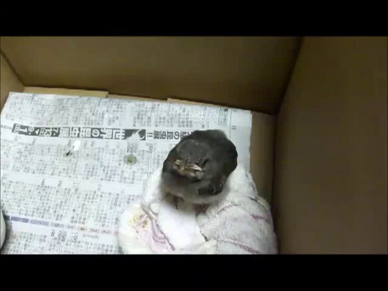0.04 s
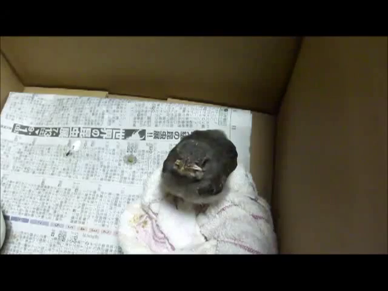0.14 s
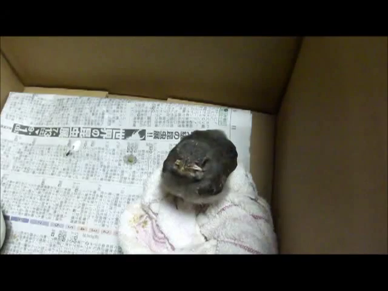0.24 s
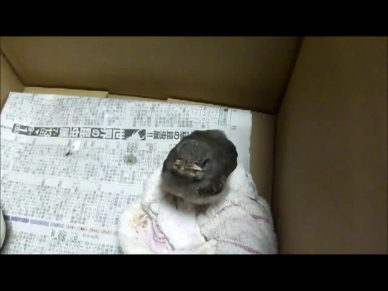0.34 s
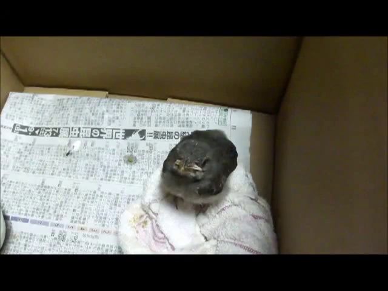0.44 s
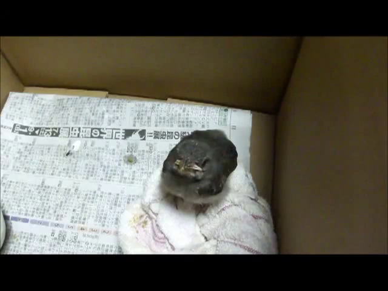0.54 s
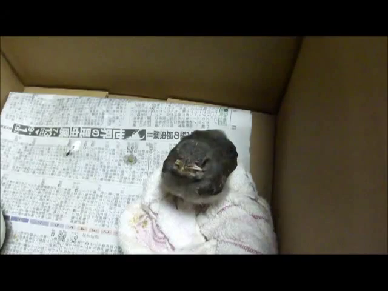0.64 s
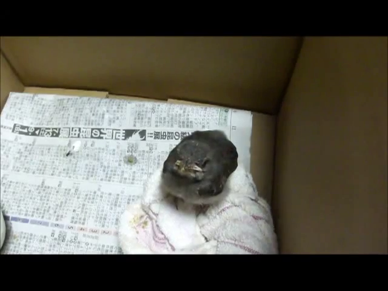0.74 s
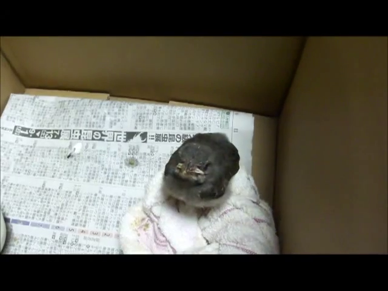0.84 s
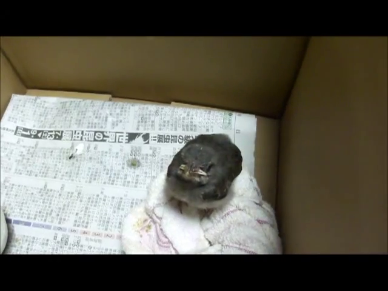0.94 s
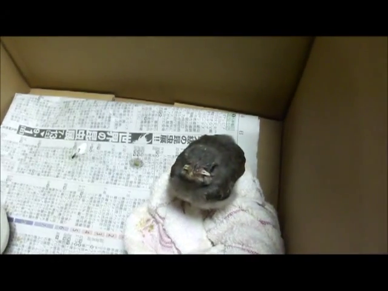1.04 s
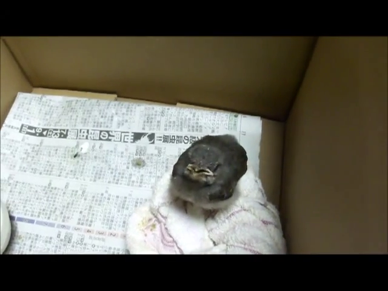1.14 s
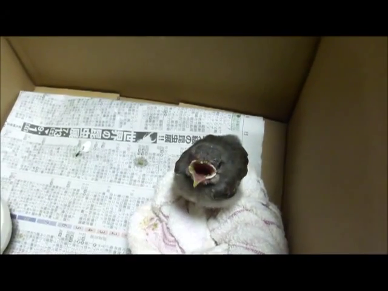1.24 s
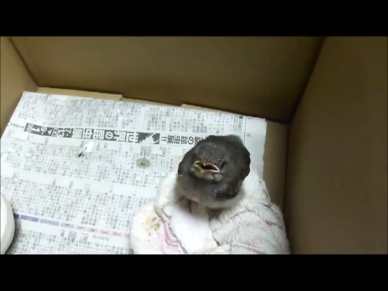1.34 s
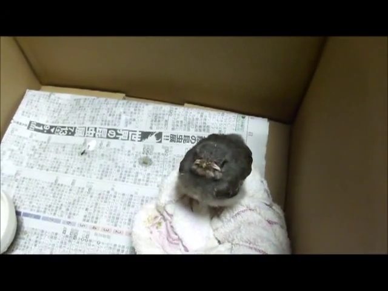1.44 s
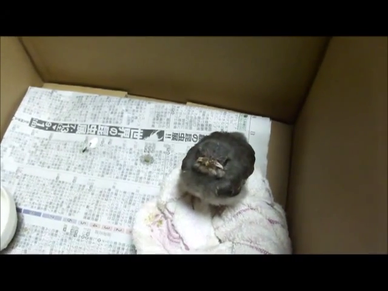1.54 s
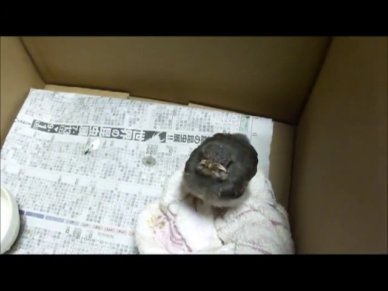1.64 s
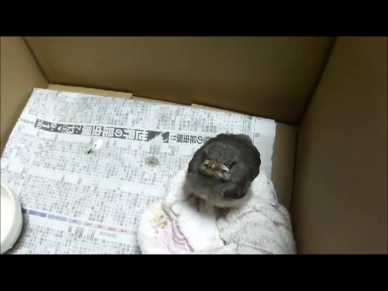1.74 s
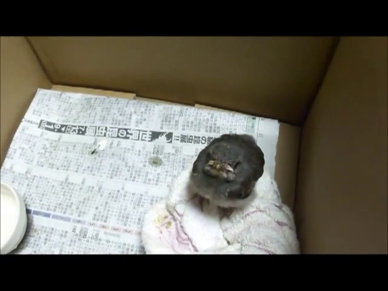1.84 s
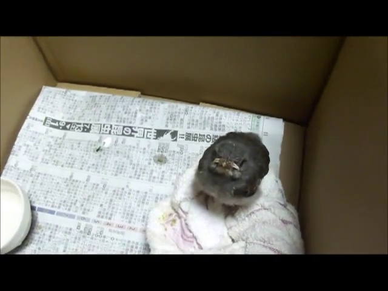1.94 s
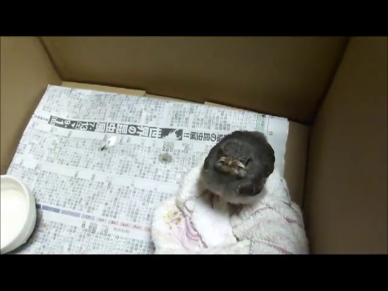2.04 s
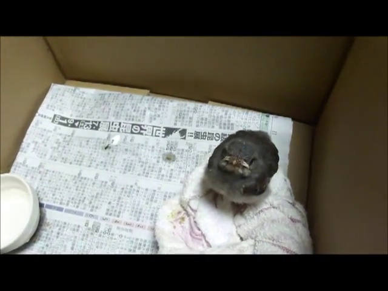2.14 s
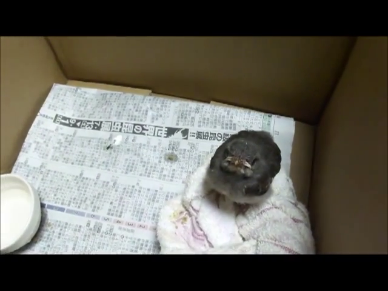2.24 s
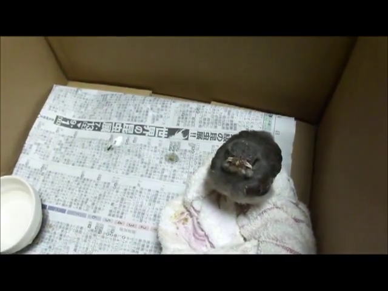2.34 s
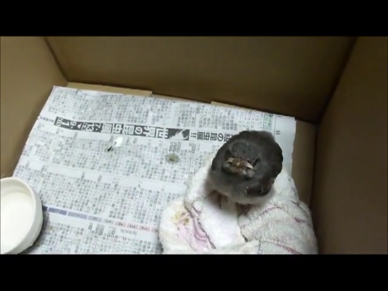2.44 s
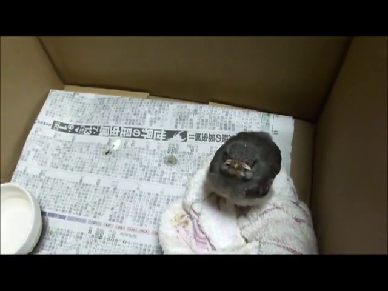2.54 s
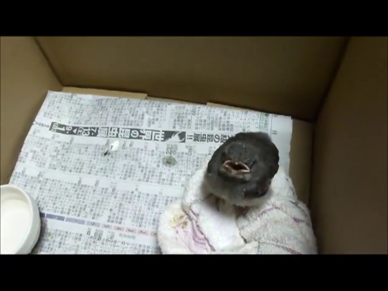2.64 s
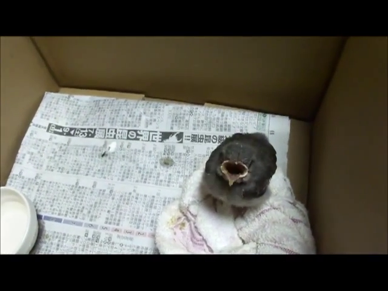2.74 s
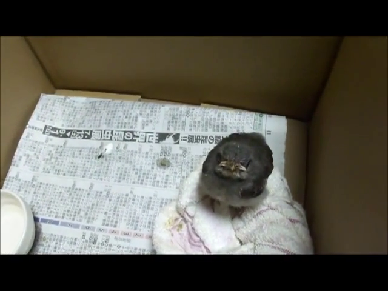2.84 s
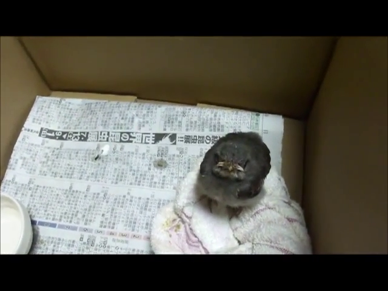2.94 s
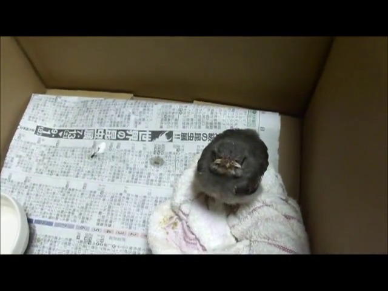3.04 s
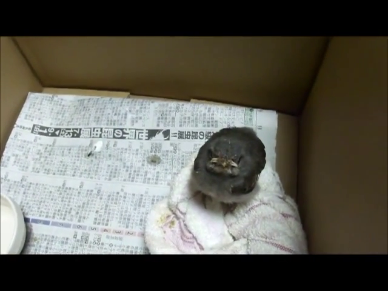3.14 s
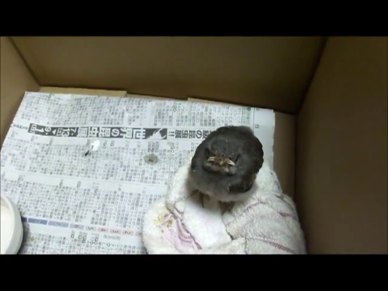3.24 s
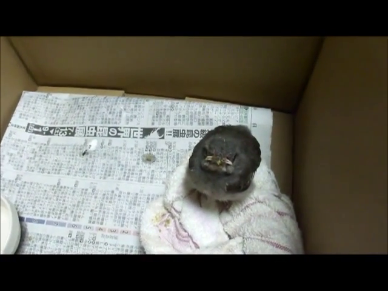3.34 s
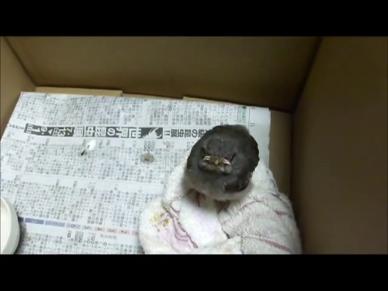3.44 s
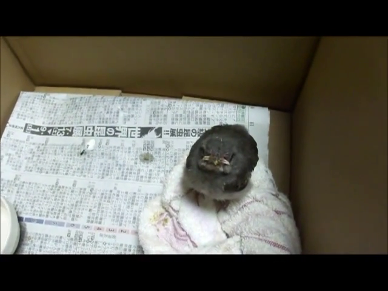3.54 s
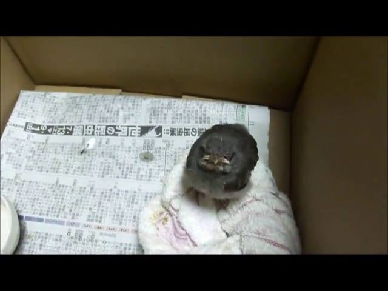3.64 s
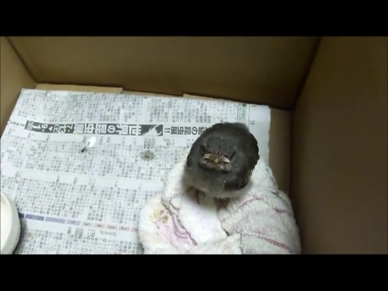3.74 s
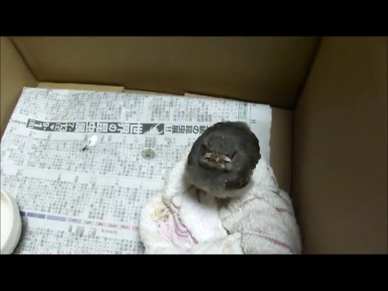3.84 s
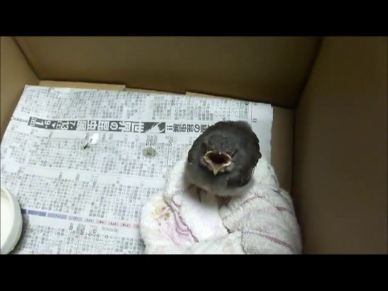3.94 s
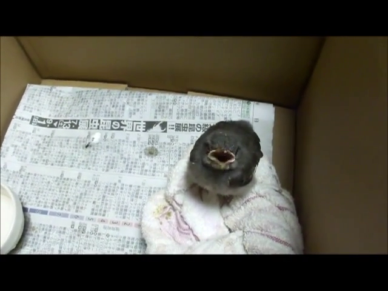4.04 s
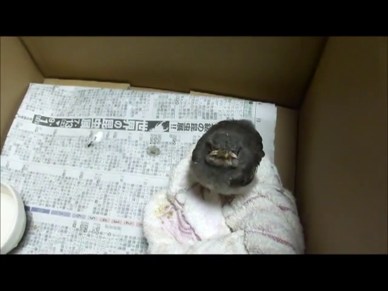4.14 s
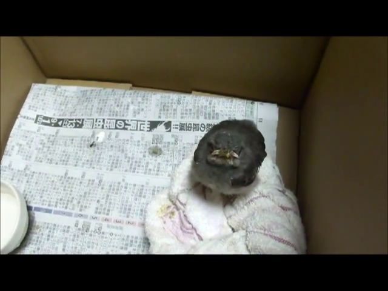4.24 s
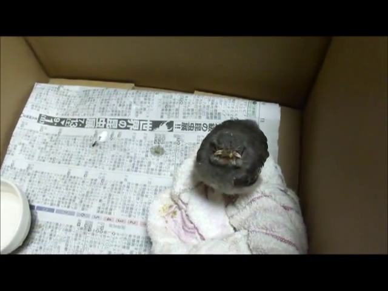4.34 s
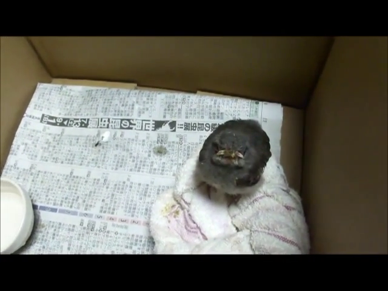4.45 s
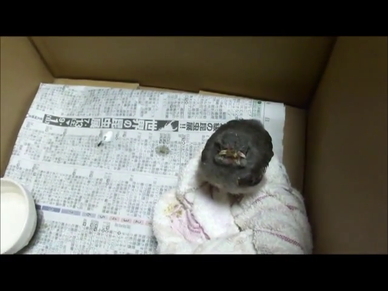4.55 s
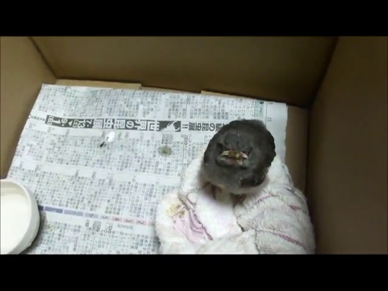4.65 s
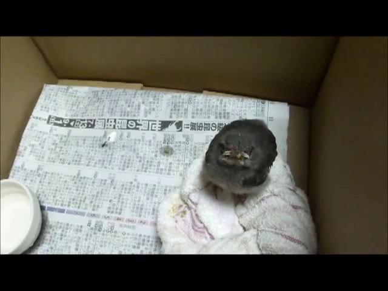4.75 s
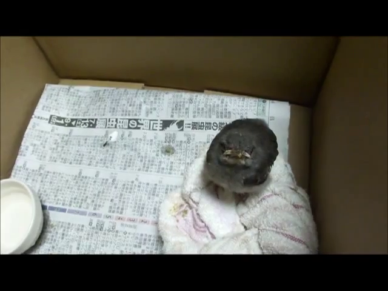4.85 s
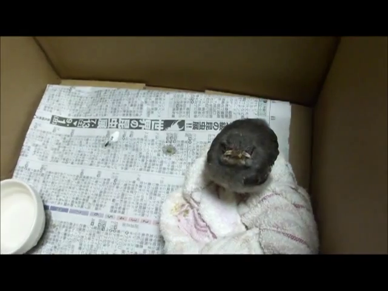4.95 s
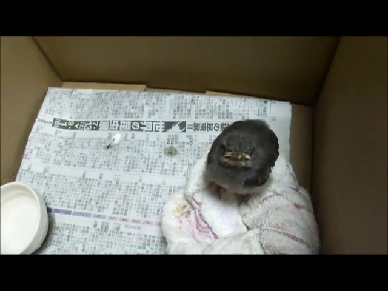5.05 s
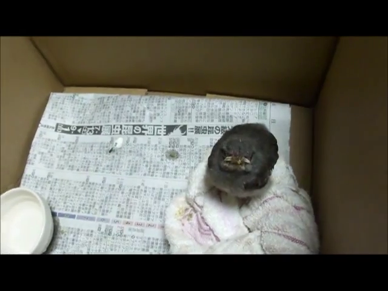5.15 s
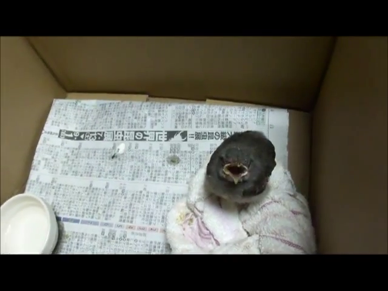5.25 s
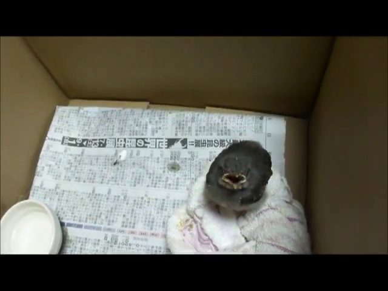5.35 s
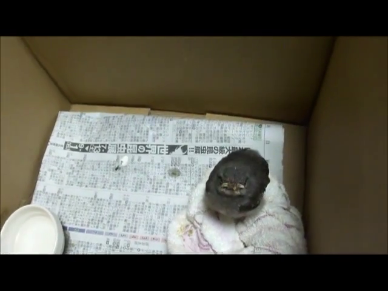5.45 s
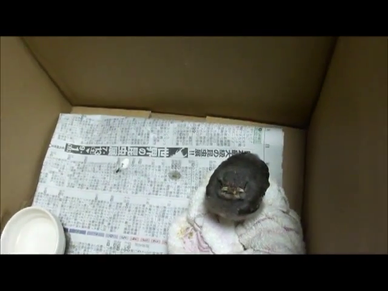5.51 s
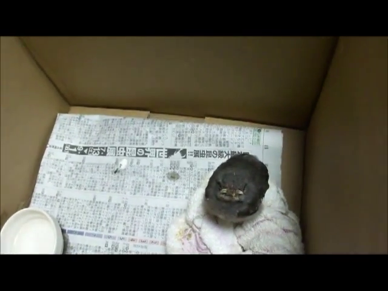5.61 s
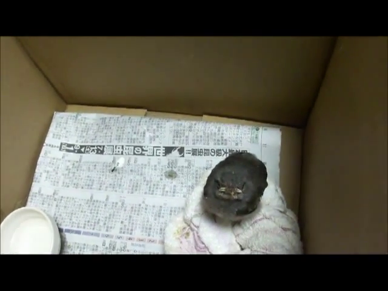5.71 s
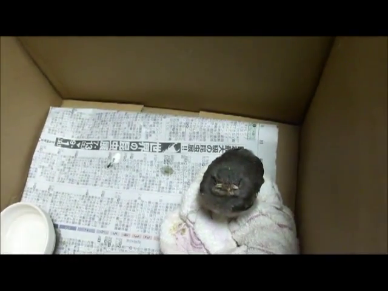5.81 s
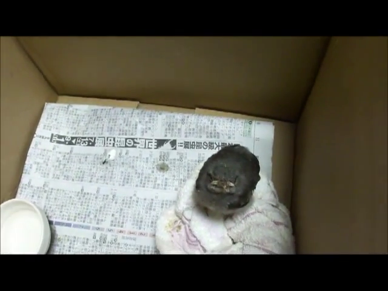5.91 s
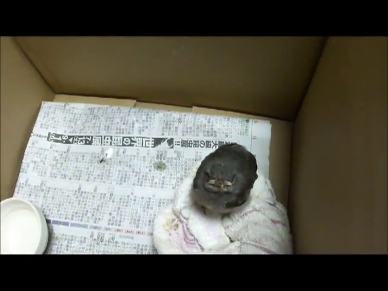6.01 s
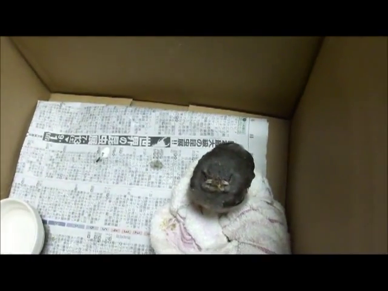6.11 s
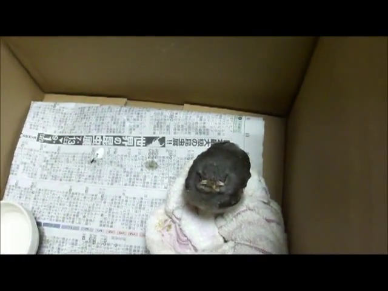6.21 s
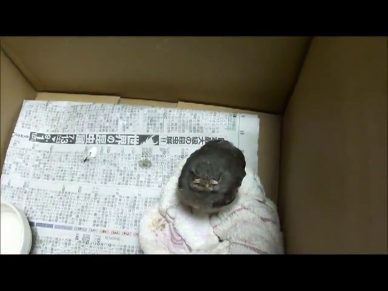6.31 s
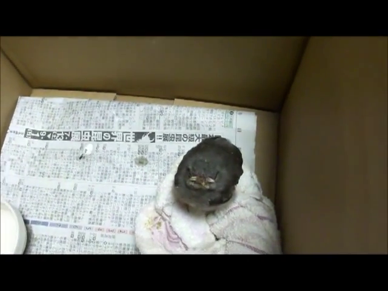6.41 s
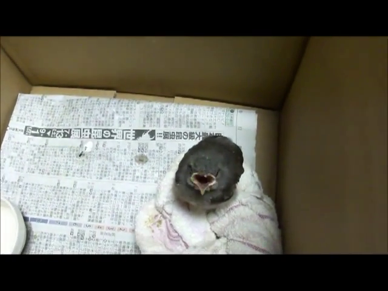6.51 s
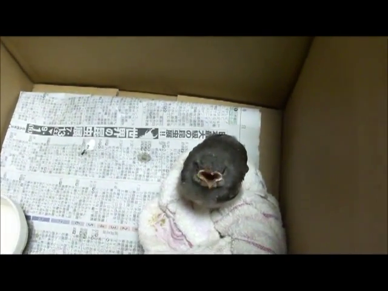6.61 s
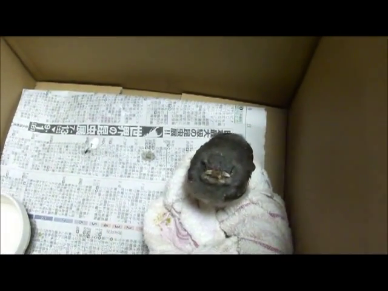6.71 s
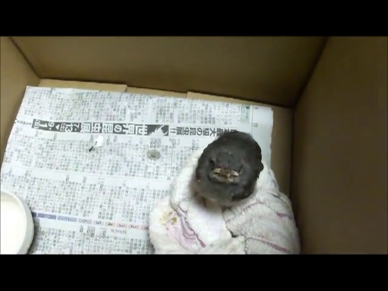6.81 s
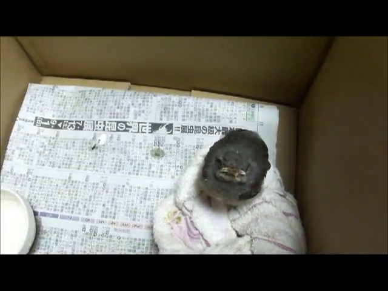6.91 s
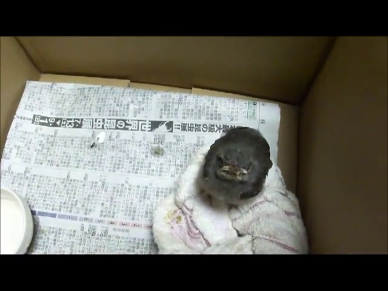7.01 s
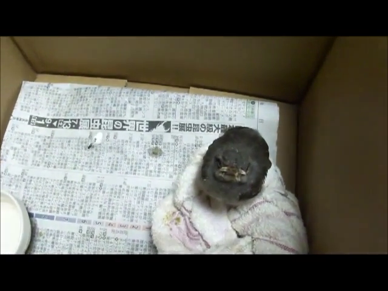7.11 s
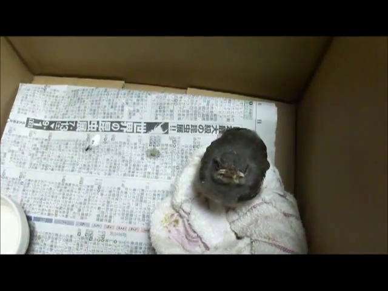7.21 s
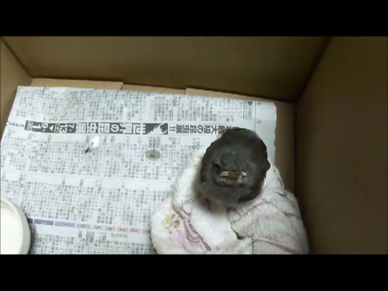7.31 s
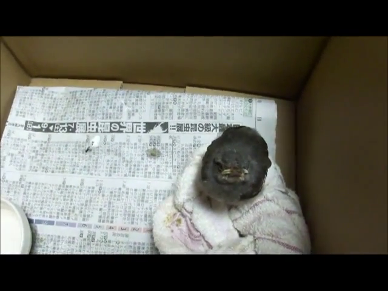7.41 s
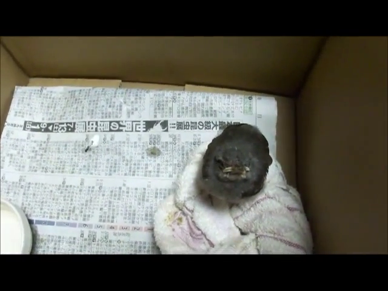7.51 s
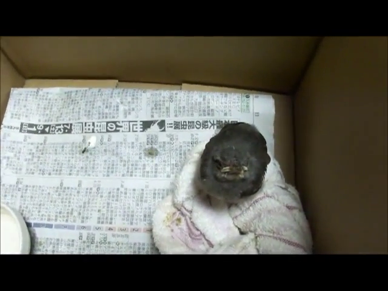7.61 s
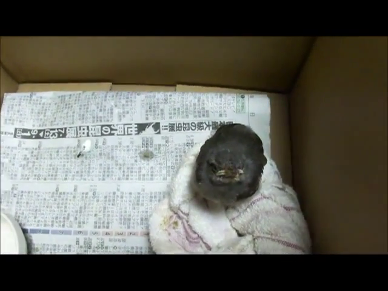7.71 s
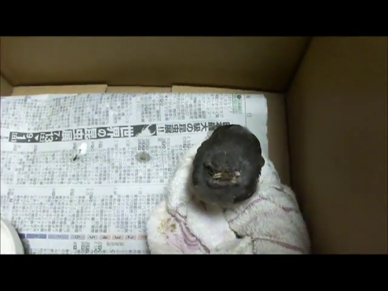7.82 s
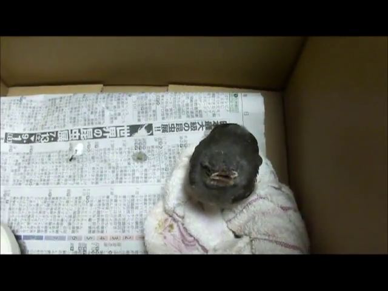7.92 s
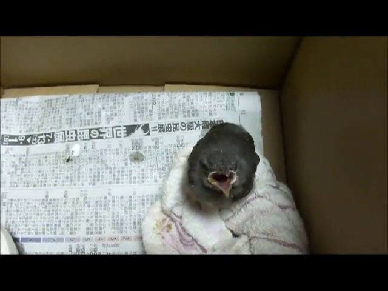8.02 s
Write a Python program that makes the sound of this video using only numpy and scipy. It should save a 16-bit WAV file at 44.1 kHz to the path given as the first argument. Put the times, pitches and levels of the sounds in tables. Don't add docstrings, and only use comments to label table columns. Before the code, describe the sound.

After brief silence a small camera microphone stutters on with a swell of hum and hiss. A close nestling gives six loud, very short, shrill begging chirps, roughly every 1.3 seconds. Early between them, a ceramic dish knocks hard on a table with a bright ring; later come lighter taps, wooden thuds and scuffs. The room is small, and a faint distant motor whine enters late.

```python
import sys
import numpy as np
from scipy import signal
from scipy.fft import rfft, irfft
from scipy.io import wavfile
from scipy.ndimage import uniform_filter1d, minimum_filter1d

SR = 44100
rng = np.random.default_rng(int(sys.argv[2]) if len(sys.argv) > 2 else 0)


def ratio_of_db(decibels):
    return 10 ** (np.asarray(decibels, float) / 20)


def wrap_up_sound(samples):
    columns = np.atleast_2d(samples).T
    tamed = np.clip(columns, -1, 1)
    steps = np.round(tamed * 32767).astype(np.int16)
    wavfile.write(sys.argv[1], SR, steps)


N = 355887

# [f/Hz, level/dB per Hz]
HUM_SPECTRUM = [(40, -18), (70, -21), (130, -11.5), (250, -1), (600, 0), (1200, -2.5), (2000, -7),
                (2500, -15.5), (2900, -31), (3600, -55.5)]
HISS_SPECTRUM = [(2200, -38), (2800, -7), (4500, -12), (5400, -4.5), (6000, 0.5), (8000, -0.5),
                 (10000, -5.5), (11200, -13.5), (12500, -47), (14000, -40), (15000, -9), (15900, -17)]
RUMBLE_SPECTRUM = [(25, -24.5), (60, -13), (120, 6.5), (180, -11.0), (400, -51.0)]
# [f/Hz, likeness 0-1]
LIKENESS = [(40, .2), (300, 0.067), (1500, 0.13), (6000, 0.17), (15000, 0.24)]
# [t/s, level/dB]
MOTOR_WHINE = [
    (5.3, -85),
    (5.6, -59),
    (6.5, -56),
    (8.07, -61),
]
# [t/s, level/dB, length/s]
GRIPS = [(1.15, -57.5, .1), (2.2, -65.5, .2), (3.012, -56, .08), (7.9, -92, .3)]
# [f/Hz, t60/s]
ROOM_T60 = [(100, 0.12), (600, .2), (2000, 0.31), (7000, 0.35), (12000, 0.23)]
# [f/Hz, width/Hz]
NOTCHES = [(3000, 230), (4050, 250), (5000, 210), (11600, 200), (12300, 1800)]
# [t/s, level/dB, centre f/Hz, width/Hz, t60/s]
SCUFFS = [(2.8871, -45, 99, 78.6, 0.39), (2.96, -45, 118, 120, 0.088), (3.032, -53, 90, 80, 0.31),
          (3.3543, -49, 1590, 920, 0.072), (3.7714, -49.5, 1600, 830, 0.11), (4.4956, -44, 6700, 320, .12),
          (4.55, -54, 11000, 350, .12), (1.694, -39, 7800, 1600, 0.33), (7.369, -36.5, 1300, 540, .02),
          (7.972, -28, 1700, 870, 0.018), (1.696, -54, 3750, 250, 0.32), (4.5, -58, 3800, 460, 0.12),
          (.806, -34, 2000, 700, 0.07), (7.971, -48, 6900, 1460, 0.0087)]
# [f/Hz, level/dB, t60/s]
TABLE_MODES = [(132.8, -8, .06), (240, -2.5, 0.17), (346, 5, .07), (520, -4, .06), (625, 2, 0.078),
               (717, -2.5, 0.15), (860, -1.5, 0.08), (1002, -2.5, 0.13), (1050, -1, 0.09),
               (1180, -4, 0.048)]
DISH_BODY = [(1314, -11.5, 0.14), (1617, 0.5, 0.26), (1650, -4.5, .15), (1703, 4.5, 0.076),
             (2200, -24.5, .05), (3780, -18.5, 0.38)]
DISH_RING = [(6340, -29, 0.057), (6940, -7, .1), (6730, 5, 0.12), (6970, 0.5, 0.1191), (8220, -22, 0.043)]
DISH_RIM = [(10480, 5, 0.14), (10560, -2, .1), (14950, -13, .14), (15120, -15, .1)]
# [t/s, level/dB, centre f/Hz]
THUDS = [(0.799, -32.5, 624), (.814, -28.5, 680), (1.239, -31.5, 630), (1.256, -38.5, 270),
         (1.69, -24.5, 288), (1.708, -19.5, 756), (2.959, -43, 364), (3.030, -45.5, 368), (3.074, -48, 383),
         (3.354, -42.5, 379), (3.543, -52, 358), (3.597, -45.5, 340), (3.771, -42, 268),
         (4.321, -42.5, 860), (4.499, -41, 1050), (4.502, -46, 338), (4.549, -46.5, 1050),
         (5.161, -50.5, 342), (7.971, -45.5, 1083)]
# [t/s, body level/dB, ring level/dB, rim level/dB]
TAPS = [
    (0.798, -62, -47, -82),
    (1.692, -25, -23.5, -37),
    (1.708, -22.5, -23.5, -31.5),
    (3.353, -49, -42, -77),
    (3.772, -52, -41, -56.5),
    (4.322, -65, -44, -66),
    (4.501, -54, -65, -70),
    (4.548, -54, -56.5, -76),
]
# [lock-in t/s, level/dB, left-right level/dB, fundamental level/dB, wobble f/Hz]
CALLS = [(1.265, -2, 2.5, 7.5, 90.4), (2.755, -3.5, 1.5, 11, 94), (4.017, -4, -2.5, 10, 103.7),
         (5.328, -3.5, 0.8, 5.5, 77), (6.592, -5, 0, 6, 75.93), (8.036, -2.5, -2.5, 8.5, 90.8)]
SYRINX_PARTIALS = [-1.5, -4, -3.5, -6.5, -11, -17]
# [f/Hz, level/dB]
THROAT = [(1800, -5.5), (2300, -12), (2800, -42), (3300, -47), (3600, -61.5), (4800, -29), (5500, -11.5),
          (6200, 5.5), (7300, 9.5), (9500, -12), (10250, -13), (10600, -36), (12900, -24.5), (14200, -25.5),
          (15600, -5.5)]
# [f/Hz, level/dB per Hz]
BREATH_SPECTRUM = [(500, -37), (1000, -17), (2200, -12), (3000, -23), (4800, -24), (5600, -5), (7000, 6.5),
                   (9000, -12), (10600, -29), (11500, -57.5), (14500, -52), (15500, -35.5)]
LEAK_SPECTRUM = [(600, -60), (1500, -31), (2500, -6.5), (3500, 1.5), (4800, -4.5), (5600, -20), (8000, -48)]
# [t from lock-in/s, pitch f/Hz, tone level/dB]
EFFORT = [
    (-.030, 2235, -54),
    (-.005, 2274, -22.5),
    (.010, 2961, -2.5),
    (.017, 3166, -0.5),
    (.042, 3300, -1),
    (.113, 3525, -3.5),
    (.120, 3369, -8),
    (.130, 2182, -10),
    (.139, 1958, -62),
]
# [t from lock-in/s, hold/s, level/dB]
PEEPS = [
    (-.028, .003, -22.5),
    (.146, 0.011, -23.5),
]
# [t from lock-in/s, level/dB, swell/dB per s, fade/dB per s]
PUFFS = [
    (.004, -19, 600, 1299),
    (0.13, -14.5, 1199.5, 750.5),
]

START_S = .7715
PORT_LAG_S = 15e-6
HUM_DB, HISS_DB, RUMBLE_DB, RUMBLE_FADE_DB_PER_S = -48.5, -62, -67, 1
WAKE_DB, WAKE_S, HISS_FOLLOWS = 15.5, 0.076, .6
UNGUARDED_DB = 7.5
WHINE_HZ, BUZZ_HZ, TICK_HZ = 1297, 59.94, 6100

PEEP_EDGE_DB_PER_S = 6000
RISE_IN_HZ_PER_S = 50000
BREATH_START_S, BREATH_UNDER_DB = -0.022, -56
WOBBLE_FROM_S, WOBBLE_FULL_S, WOBBLE_END_S, WOBBLE_TROUGH_S = 0.014, 0.098, 0.12, .0635
SAG_DB = 12
THINNING_FROM_S, THINNING_DB_PER_S = .09, 599.5
GAPE_OPEN_S, GAPE_SHUT_S = 0.012, .133
OPENING_DB_PER_S, WIDENING_DB_PER_S, SHUTTING_DB_PER_S = 899.5, 50.5, 3500


def columns(rows, at):
    s, *rest = np.transpose(rows)
    return [np.interp(at, s, c) for c in rest]


def at_hz(points, hz):
    point_hz, value = np.transpose(points)
    return np.interp(np.log(np.maximum(hz, 1)), np.log(point_hz), value)


def rms_one(x):
    return x / np.sqrt(np.mean(x ** 2) + 1e-20)


def coloured(spectrum, count):
    hz = np.arange(count // 2 + 1) * SR / count
    mid, side = rfft(rng.standard_normal((2, count))) * ratio_of_db(at_hz(spectrum, hz))
    alike = np.clip(at_hz(LIKENESS, hz), 0, 1)
    left_right = np.sqrt(1 + alike) * mid + np.sqrt(1 - alike) * side * [[1], [-1]]
    return rms_one(irfft(left_right, count))


def drift(rate):
    knots = rng.standard_normal(int(N / SR * 100) + 2)
    return np.interp(np.arange(N) / SR * rate, np.arange(len(knots)), knots)


def smooth_chance(count, size):
    x = rng.standard_normal(count)
    for _ in range(3):
        x = uniform_filter1d(x, size)
    return rms_one(x)


def ring(clicks, hz, t60):
    r, w = ratio_of_db(-60 / (t60 * SR)), 2 * np.pi * hz / SR
    return signal.lfilter([0, np.sin(w)], [1, -2 * r * np.cos(w), r * r], clicks + 1e-18)


def ambience():
    t = np.arange(N) / SR
    wake_db = WAKE_DB * np.exp(-np.maximum(t - START_S, 0) / WAKE_S)
    early_db = UNGUARDED_DB * np.clip((CALLS[0][0] + .02 - t) / .02, 0, 1)
    hum = ratio_of_db(HUM_DB + early_db + wake_db + drift(25)) * coloured(HUM_SPECTRUM, N)

    cycle = (t - .9495) * BUZZ_HZ
    strength = ratio_of_db(4.5 * np.tanh(rng.standard_normal(N // 500)))
    strength = strength[np.clip(cycle, 0, None).astype(int)]
    ticks = strength * np.exp(-(cycle % 1) / 0.061) * rng.standard_normal(N)
    ticks = ring(ring(ticks, TICK_HZ, .002), TICK_HZ, .002)
    hiss = coloured(HISS_SPECTRUM, N) + ratio_of_db(-12) * rms_one(ticks)
    hiss = ratio_of_db(HISS_DB + early_db + HISS_FOLLOWS * wake_db) * hiss

    grip = ratio_of_db(RUMBLE_DB - RUMBLE_FADE_DB_PER_S * t)
    for s, db, length in GRIPS:
        grip = grip + ratio_of_db(db) * np.exp(-((t - s) / length) ** 2)
    rumble = grip * ratio_of_db(3.6 * drift(35)) * coloured(RUMBLE_SPECTRUM, N)

    whine_db = columns(MOTOR_WHINE, t)[0] + 2.0 * drift(20)
    whine = ratio_of_db(whine_db) * np.sin(2 * np.pi * WHINE_HZ * t + 1.1 * drift(21))
    return hum + hiss + rumble + whine


def room(x, gap_s, onset_s, alike):
    t = np.arange(SR // 2) / SR
    shared, left, right = rng.standard_normal((3, len(t)))
    noise = np.sqrt(alike) * shared + np.sqrt(1 - alike) * np.array([left, right])
    build_up = 1 - np.exp(-np.maximum(t - gap_s, 0) / onset_s)
    edges, tail = 60 * 2. ** np.arange(9), 0
    for low, high in zip(edges, np.append(edges[1:], .45 * SR)):
        band = signal.sosfilt(signal.butter(2, [low, high], "band", fs=SR, output="sos"), noise)
        decay = ratio_of_db(-60 * t / at_hz(ROOM_T60, np.sqrt(low * high))) * build_up
        tail = tail + band * decay / np.sqrt(np.sum(decay ** 2))
    return signal.fftconvolve(np.broadcast_to(x, (2, N)), tail, axes=1)[:, :N]


def scuffs():
    out, t = np.zeros(N + SR), np.arange(SR // 2) / SR
    for start, level_db, hz, width_hz, t60 in SCUFFS:
        peak = np.concatenate(signal.iirpeak(hz, hz / width_hz, SR))
        noise = rms_one(signal.sosfilt([peak, peak], rng.standard_normal(len(t))))
        fade_in = np.minimum(t * hz, 1)
        first = round(start * SR)
        out[first:first + len(t)] += noise * ratio_of_db(level_db - 60 * t / t60) * fade_in
    return out[:N]


def strike(modes, s, blows_db):
    out, contact_s = 0, .006
    for (hz, level_db, t60), blow_db in zip(modes, blows_db):
        clicks = np.zeros(N)
        clicks[(s * SR).astype(int)] = ratio_of_db(blow_db + level_db + rng.normal(0, 1.5, len(s)))
        softened = ring(clicks, hz, contact_s)
        out = out + ring(softened, hz, t60) * 2 * np.log(1000) / (contact_s * SR)
    return out


def knocks():
    thud_s, thud_db, centre_hz = np.transpose(THUDS)
    tap_s, *dish_db = np.transpose(TAPS)
    table_db = [thud_db - 25 * np.log2(mode[0] / centre_hz) ** 2 for mode in TABLE_MODES]
    out = strike(TABLE_MODES, thud_s, table_db)
    for modes, blow_db in zip([DISH_BODY, DISH_RING, DISH_RIM], dish_db):
        out = out + strike(modes, tap_s, [blow_db] * len(modes))

    puff = np.zeros((2, N))
    puff[0, (thud_s * SR).astype(int)] = ratio_of_db(thud_db - 1.0)
    puff[1, (tap_s * SR).astype(int)] = ratio_of_db(dish_db[1] - 9.5)
    puff = signal.lfilter([1], [1, -np.exp(-1 / (0.0052 * SR))], puff)
    out = out + puff[0] * coloured(HUM_SPECTRUM, N)[0] + puff[1] * coloured(HISS_SPECTRUM, N)[0]
    return signal.sosfilt(signal.butter(3, 190, "high", fs=SR, output="sos"), out)


def call_controls(t):
    hz, tone_db = columns(EFFORT, t)
    hz = hz - RISE_IN_HZ_PER_S * np.clip(PEEPS[0][0] + PEEPS[0][1] - t, 0, .012)
    for start, hold, db in PEEPS:
        outside_s = np.maximum(0, np.maximum(start - t, t - start - hold))
        tone_db = np.maximum(tone_db, db - PEEP_EDGE_DB_PER_S * outside_s)
    overtones_db = np.minimum.reduce([OPENING_DB_PER_S * (t - GAPE_OPEN_S),
                                      WIDENING_DB_PER_S * t - 4.5,
                                      SHUTTING_DB_PER_S * (GAPE_SHUT_S - t)])
    depth = np.clip((t - WOBBLE_FROM_S) / (WOBBLE_FULL_S - WOBBLE_FROM_S), 0, 1)
    depth = depth * np.clip((WOBBLE_END_S - t) / 0.0023, 0, 1)
    hoarse = ratio_of_db(BREATH_UNDER_DB) * np.clip(12 * depth, 0, 1)
    for peak, db, swell, fade in PUFFS:
        hoarse = hoarse + ratio_of_db(db - np.maximum(swell * (peak - t), fade * (t - peak)))
    hoarse = hoarse * np.clip((t - BREATH_START_S) / 0.00075, 0, 1)
    return hz, tone_db, overtones_db, hoarse, depth


def syrinx(phase, hz, fundamental_db, overtones_db, thinning_db, unsteady_db):
    tone = 0
    for k, source_db in enumerate(SYRINX_PARTIALS, 1):
        partial_db = source_db + at_hz(THROAT, k * hz)
        if k == 1:
            partial_db = partial_db + fundamental_db * np.clip(hz / 300 - 9, 0, 1)
        else:
            partial_db = partial_db + overtones_db
        if k != 2:
            partial_db = partial_db + unsteady_db
        if k % 2:
            partial_db = partial_db - thinning_db * np.clip(k * hz / 400 - 6, 0, 1)
        tone = tone + ratio_of_db(partial_db) * np.sin(k * phase)
    return tone


def nestling():
    out = np.zeros((2, N + SR))
    side = np.array([[.5], [-.5]])
    t = np.arange(-.04, .18, 1 / SR)
    hz, tone_db, overtones_db, hoarse, depth = call_controls(t)
    thinning_db = THINNING_DB_PER_S * np.maximum(t - THINNING_FROM_S, 0)
    for start, level_db, pan_db, fundamental_db, wobble_hz in CALLS:
        cycle = wobble_hz * (t - WOBBLE_TROUGH_S) + .09 * smooth_chance(len(t), 500)
        wobble = -np.cos(2 * np.pi * cycle)
        uneven = rng.uniform(.35, 1.3, 40)[np.round(cycle).astype(int) + 15]
        jitter, flutter = smooth_chance(len(t), 45), smooth_chance(len(t), 60)

        looseness = .0018 + .012 * (hoarse / ratio_of_db(tone_db)).clip(0, 1)
        vibrato = (.007 + 0.007 * depth) * wobble * np.clip(12 * depth, 0, 1)
        shaken_hz = hz * (1 + looseness * jitter + vibrato)
        phase = 2 * np.pi * (np.cumsum(shaken_hz) / SR - side * hz * PORT_LAG_S)
        unsteady_db = 3.0 * flutter - 2.6 * side
        tone = syrinx(phase, hz, fundamental_db, overtones_db, thinning_db, unsteady_db)
        sag_db = SAG_DB * uneven * depth ** 1.3 * ((1 - wobble) / 2) ** 2.5
        tone = tone * ratio_of_db(tone_db - sag_db)

        breath = hoarse * ratio_of_db(3.5 * np.tanh(flutter)) * coloured(BREATH_SPECTRUM, len(t))
        leak_db = -43.5 + 3.0 * wobble + 2.1 * jitter
        breath = breath + ratio_of_db(leak_db) * depth * coloured(LEAK_SPECTRUM, len(t))[0]
        first = round((start - .04) * SR)
        out[:, first:first + len(t)] += ratio_of_db(level_db + pan_db * side) * (tone + breath)
    return out[:, :N]


def scene():
    bird, hits = nestling(), knocks() + scuffs()
    alike = .55
    near = bird + ratio_of_db(-10.5) * room(bird, gap_s=0.003, onset_s=0.0032, alike=alike)
    far = hits * ratio_of_db([[-1.2], [1.2]])
    far = far + ratio_of_db(5.0) * room(hits, gap_s=0.0093, onset_s=0.0018, alike=alike)
    return ratio_of_db(8.5) * near + far + ambience()


def band_limit(x):
    return signal.sosfilt(signal.butter(12, 16280, fs=SR, output="sos"), x)


def record(dry):
    dry = signal.sosfilt(signal.butter(2, 120, "high", fs=SR, output="sos"), dry)
    for hz, width_hz in NOTCHES:
        notch = np.concatenate(signal.iirnotch(hz, hz / width_hz, SR))
        dry = signal.sosfilt([notch, notch], dry)
    dry = signal.sosfilt(signal.cheby2(10, 60, 16500, fs=SR, output="sos"), dry)
    t = np.arange(N) / SR
    over_db = np.maximum(20 * np.log10(np.abs(dry).max(0) + 1e-9) + 3.0, 0)
    held_db = np.maximum.accumulate(over_db + 110 * t) - 110 * t
    ahead_db = -minimum_filter1d(-held_db, size=90)
    gain = ratio_of_db(-.8 * uniform_filter1d(ahead_db, size=90))
    switch_on = np.interp(t - START_S, [0, .0002, .004, .0095, .012, .03],
                          [0, 1.0, 0.16, 0.072, 0.0, 1.0])
    mix = np.clip(dry * gain * switch_on, -1, 1)
    return band_limit(mix)


dry = scene()
out = record(dry)
wrap_up_sound(out)
```